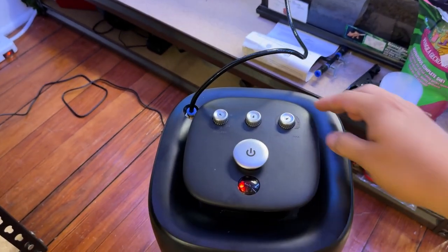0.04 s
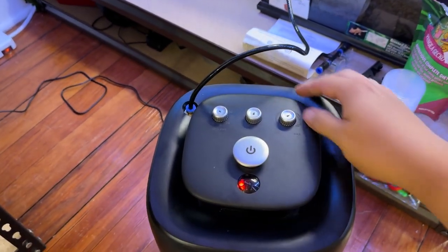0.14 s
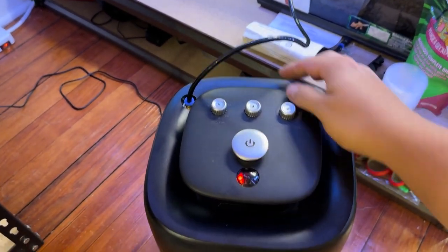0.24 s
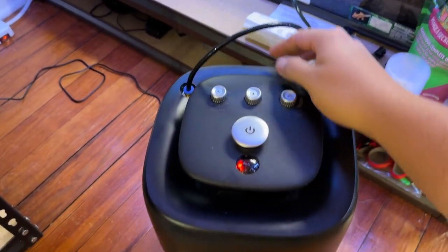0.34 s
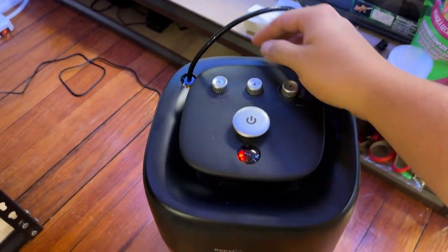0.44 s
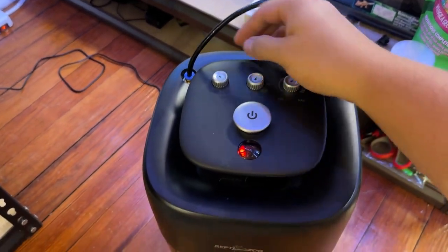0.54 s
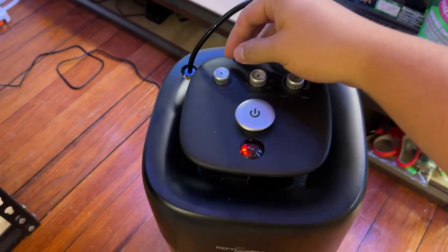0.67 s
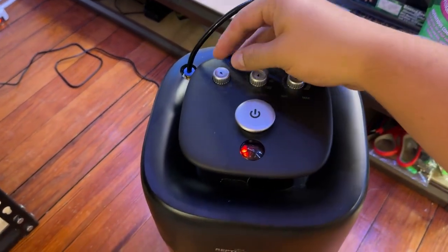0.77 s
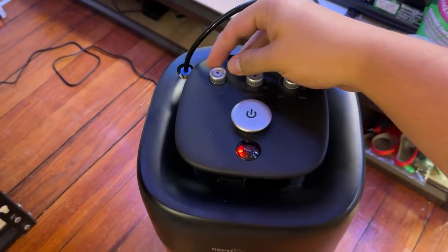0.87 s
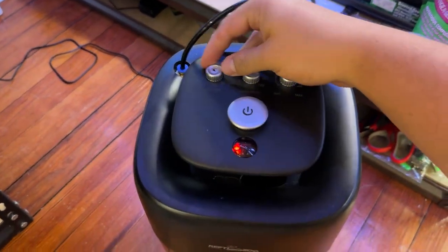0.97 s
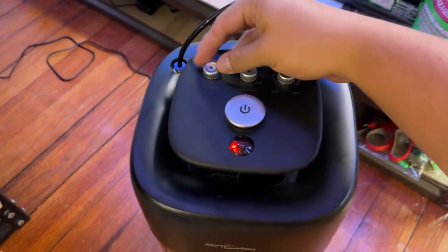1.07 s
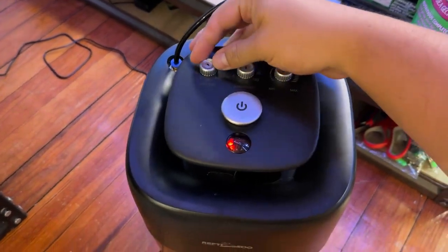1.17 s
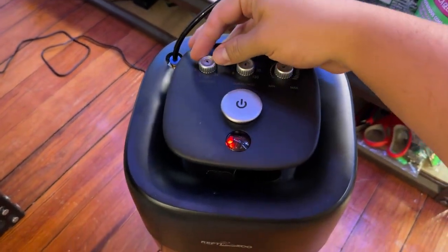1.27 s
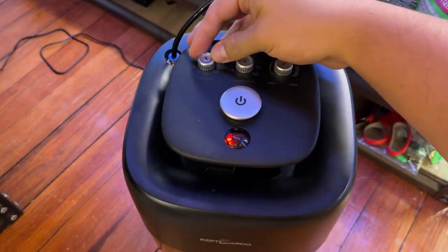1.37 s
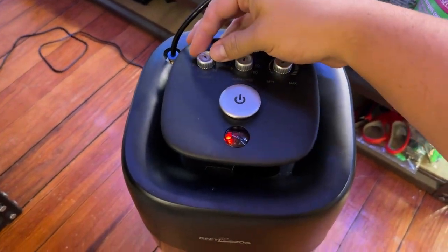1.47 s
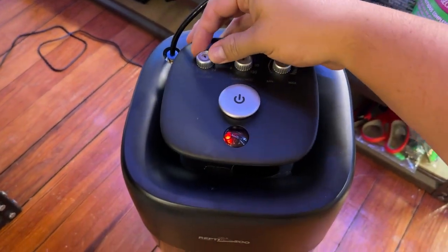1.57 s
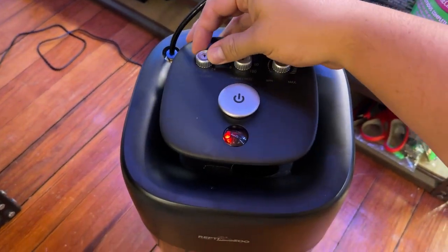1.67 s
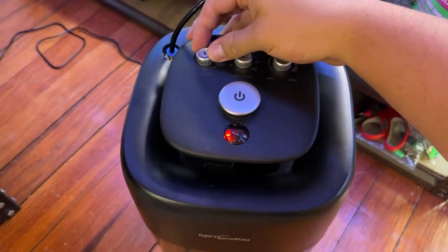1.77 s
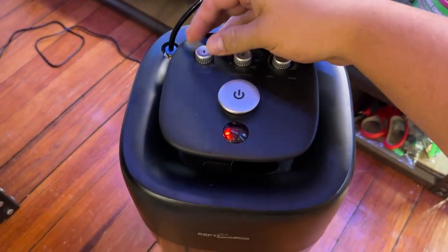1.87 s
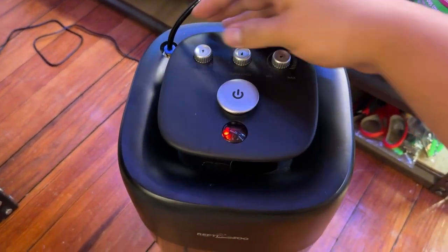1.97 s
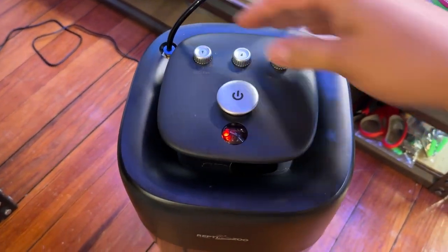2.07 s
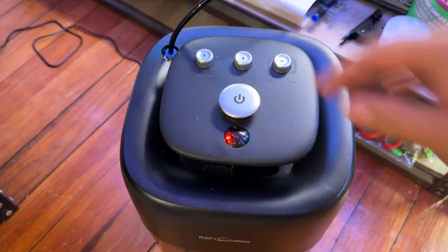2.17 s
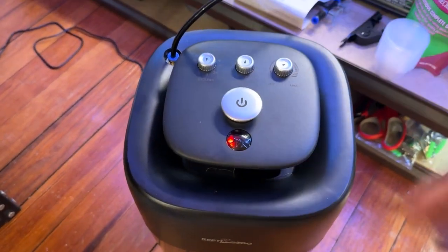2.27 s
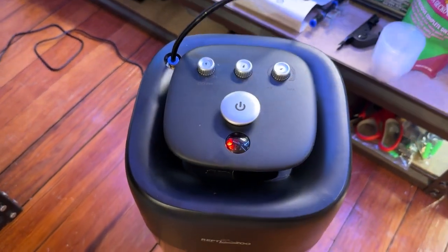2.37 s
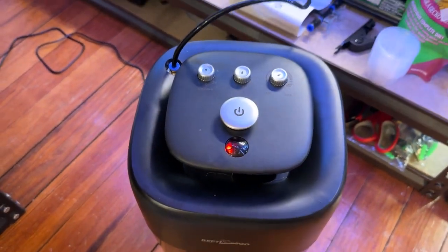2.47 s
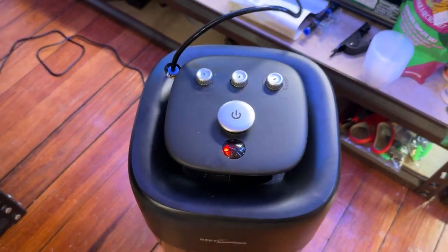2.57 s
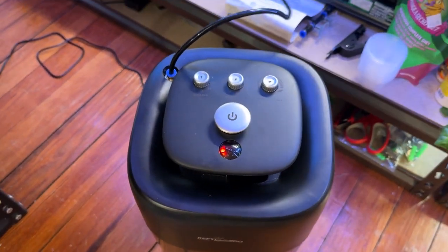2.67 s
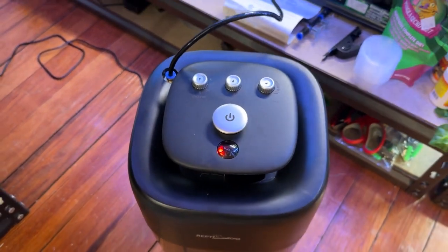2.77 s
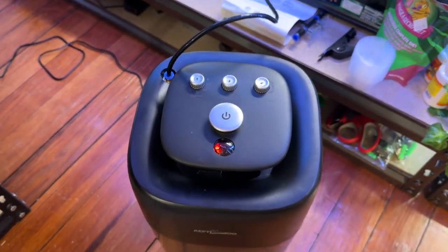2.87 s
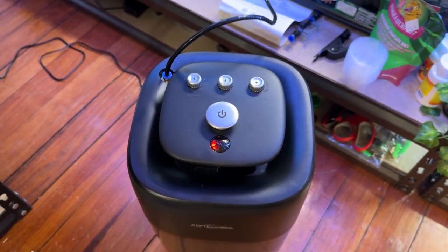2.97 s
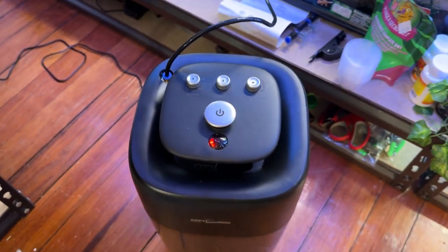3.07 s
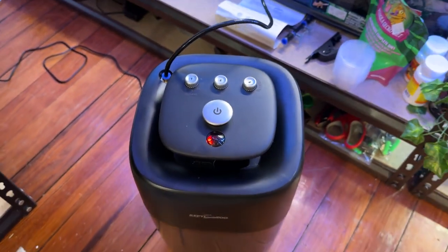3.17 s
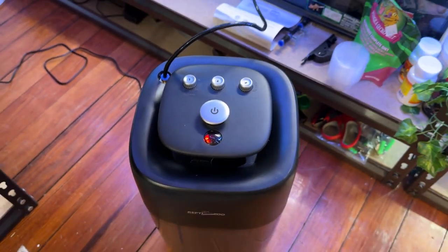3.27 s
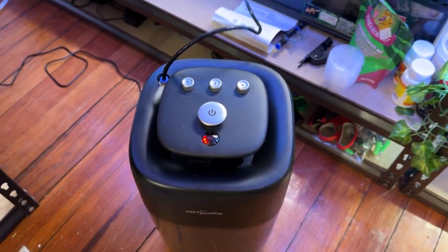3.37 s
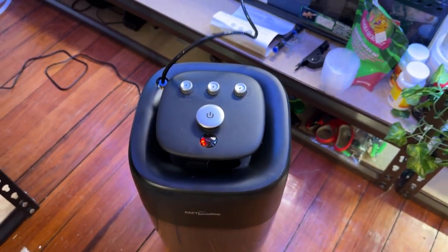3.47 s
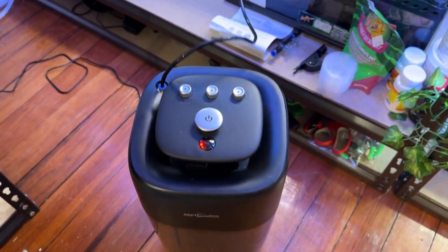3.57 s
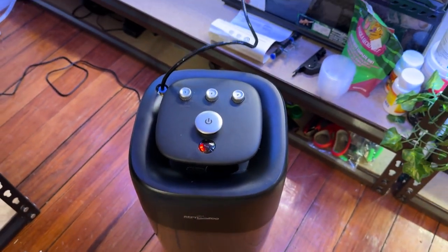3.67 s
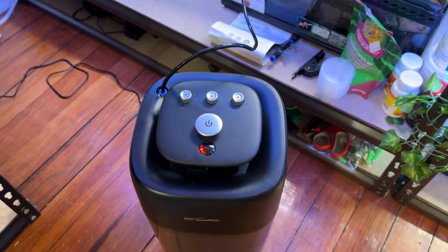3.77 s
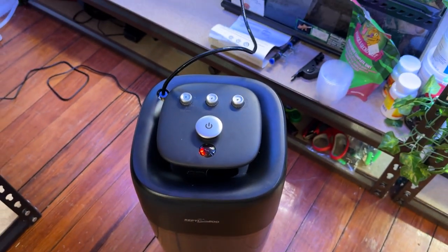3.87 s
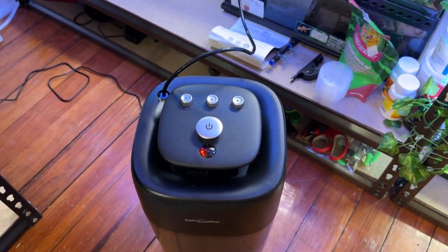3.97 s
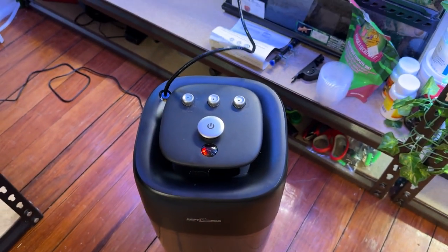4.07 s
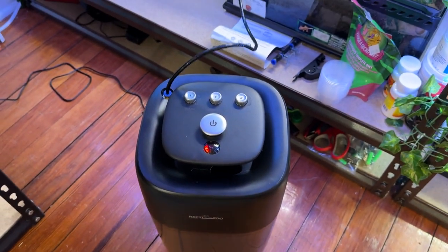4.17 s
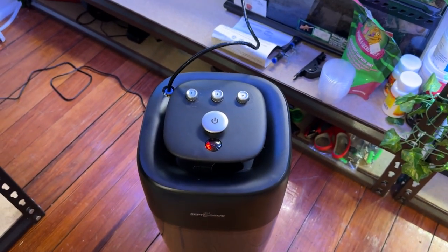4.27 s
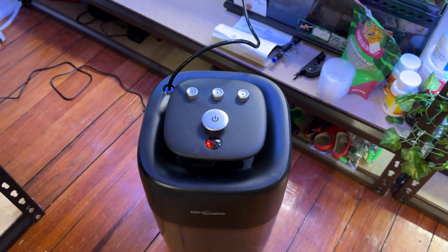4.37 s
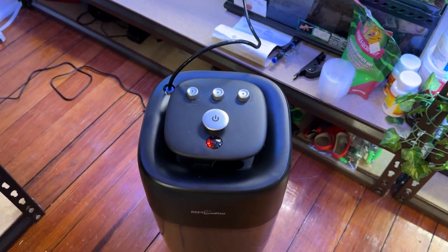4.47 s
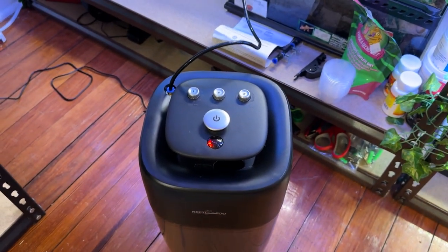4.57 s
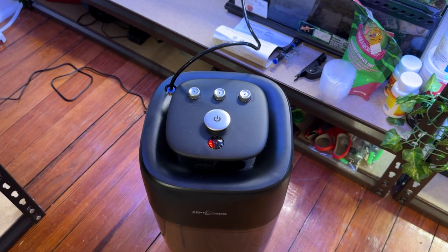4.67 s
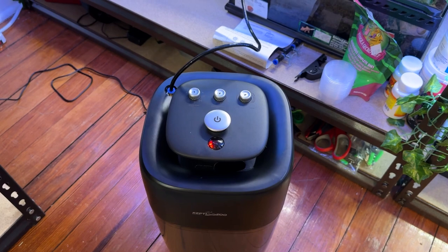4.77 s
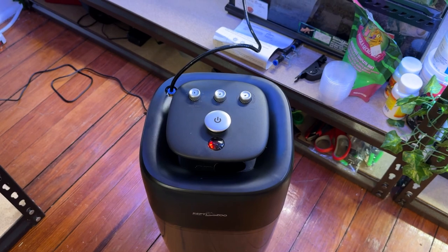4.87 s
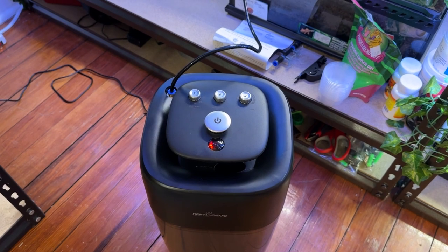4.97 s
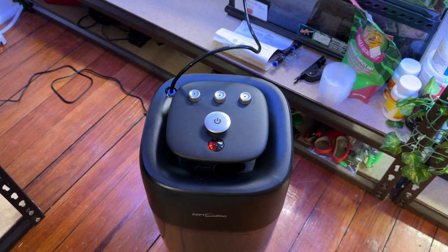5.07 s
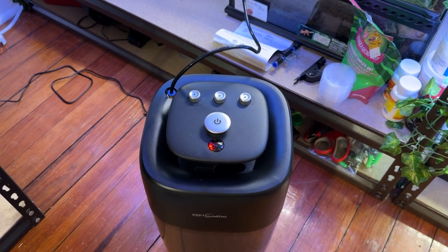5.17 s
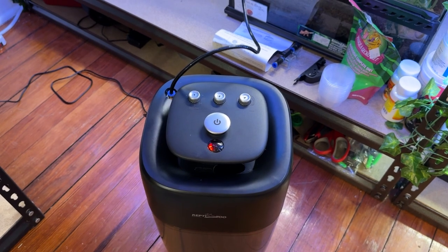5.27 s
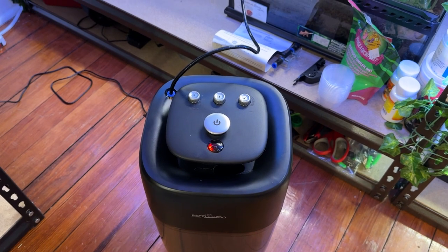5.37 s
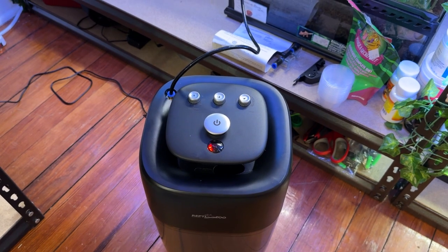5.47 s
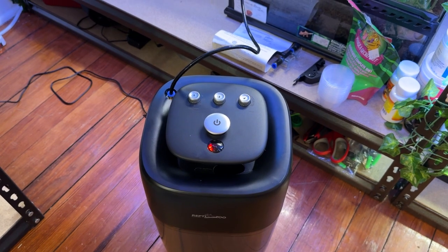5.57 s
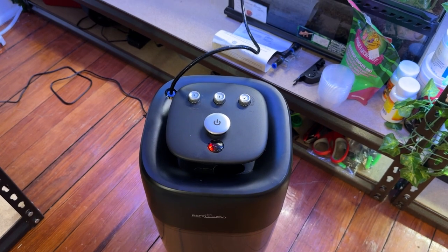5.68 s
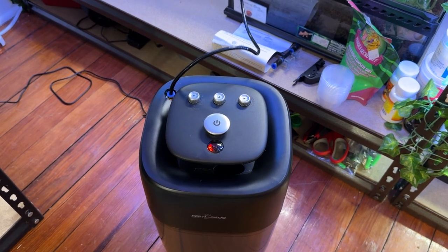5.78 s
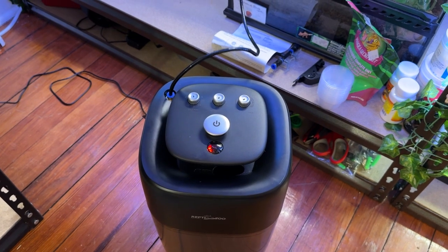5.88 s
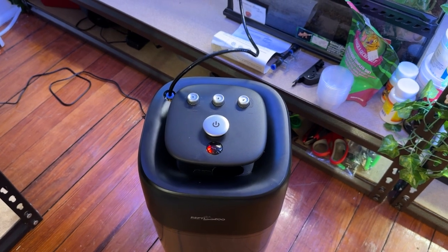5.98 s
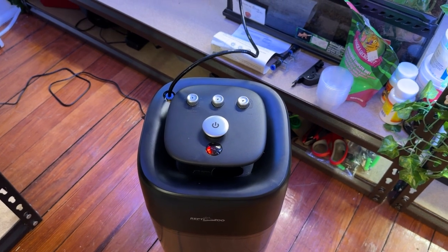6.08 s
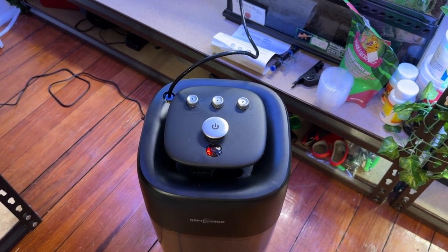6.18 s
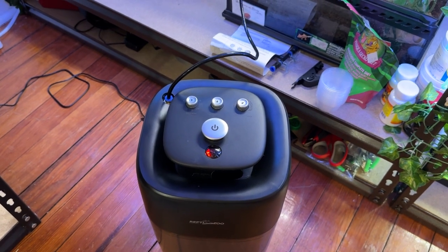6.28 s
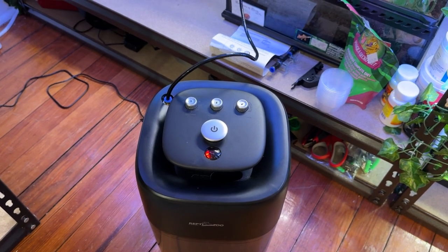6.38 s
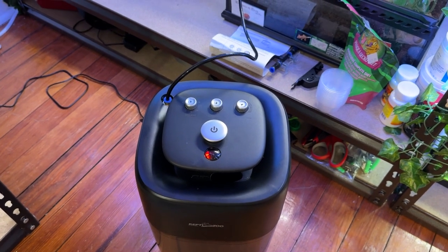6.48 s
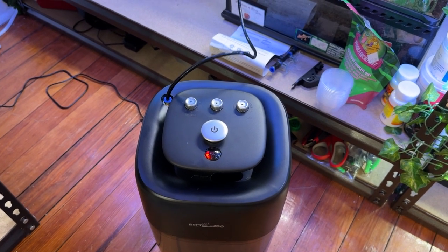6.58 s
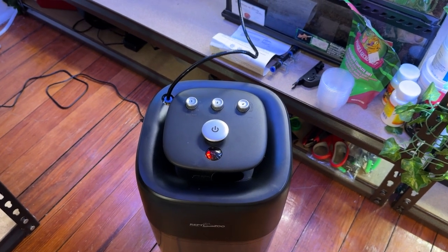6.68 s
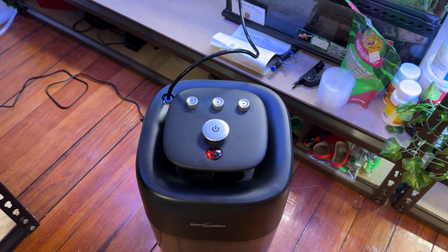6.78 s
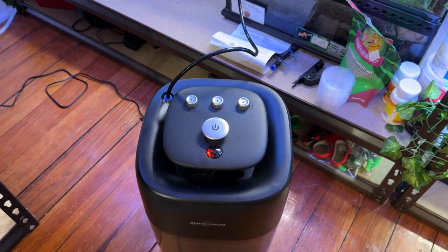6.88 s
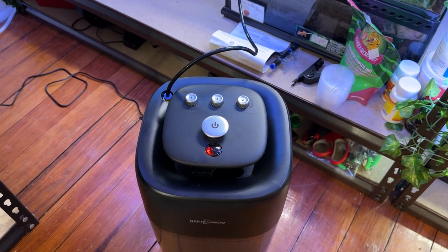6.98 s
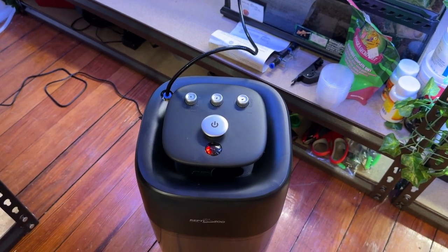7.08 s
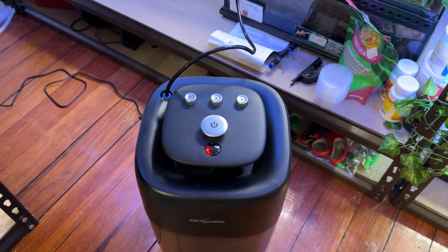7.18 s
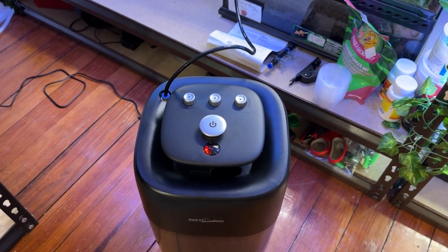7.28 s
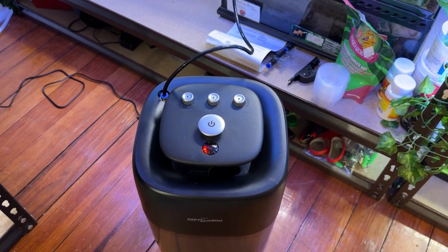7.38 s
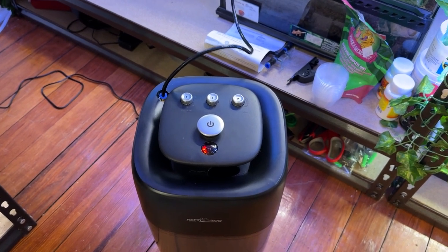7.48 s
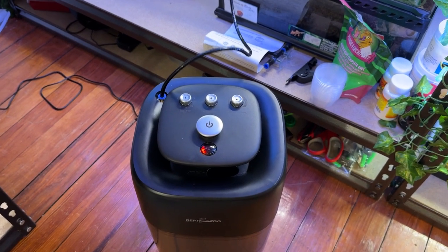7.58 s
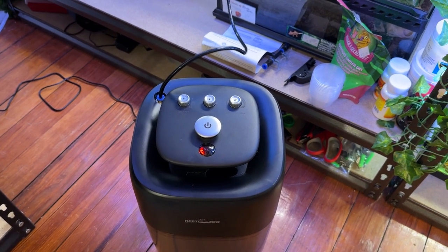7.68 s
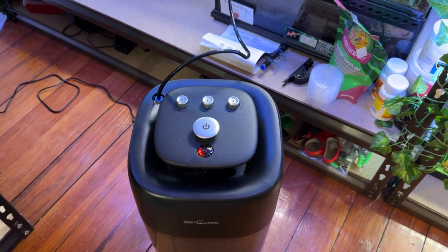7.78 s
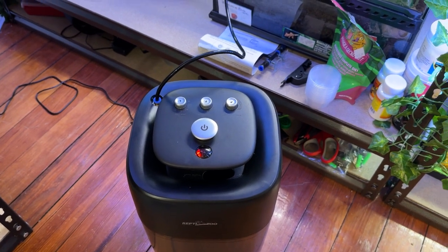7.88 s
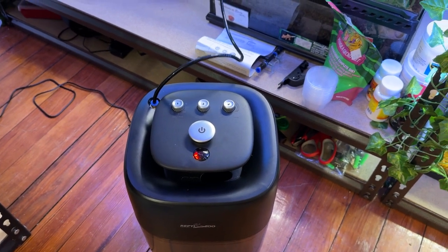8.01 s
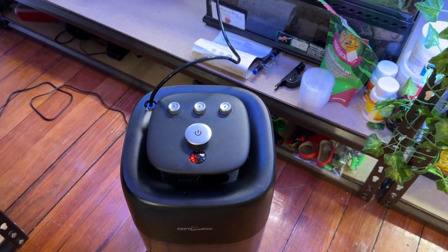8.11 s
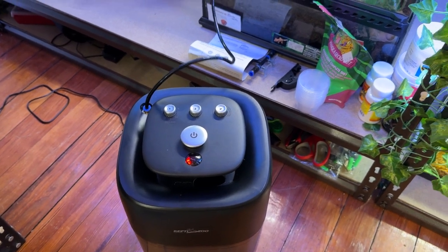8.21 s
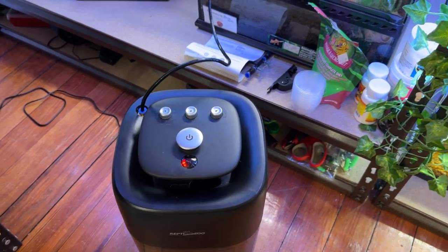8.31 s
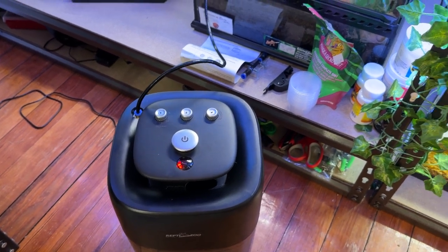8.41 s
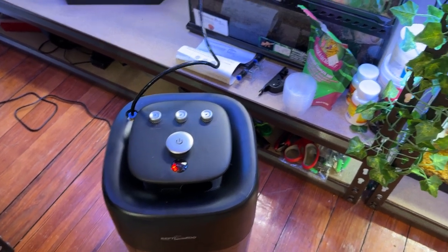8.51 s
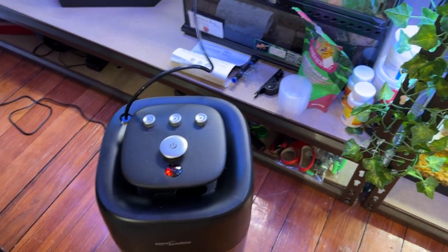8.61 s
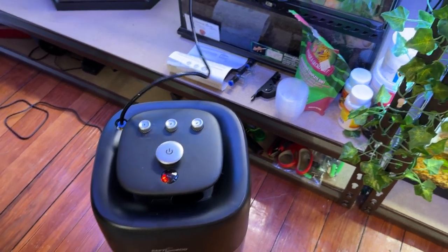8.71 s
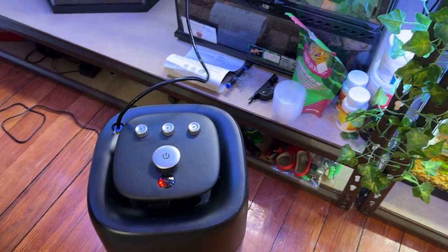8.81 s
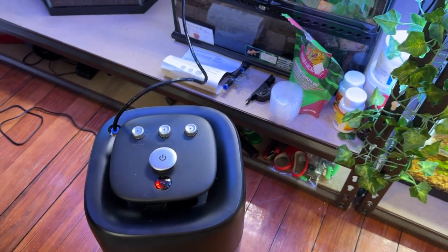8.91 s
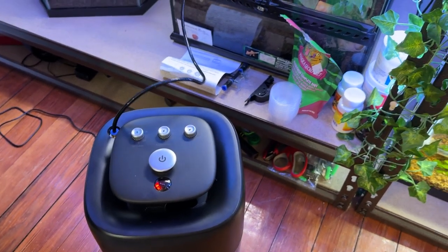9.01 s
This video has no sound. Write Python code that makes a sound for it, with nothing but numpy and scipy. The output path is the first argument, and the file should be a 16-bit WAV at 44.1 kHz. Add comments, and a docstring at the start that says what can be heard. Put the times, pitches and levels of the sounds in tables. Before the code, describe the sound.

A knob clicks, a small pump thumps on and hums steadily, water gurgles in its line, and a thin hiss grows into a full misting spray.

```python
"""A small misting pump hums on one steady note in a quiet room, close to the microphone, on a wooden floor.
A knob clicks, the pump starts with thumps, and water gurgles in its line as ringing bubbles and flow noise.
The nozzle spits; then, as the pressure rises, a thin hiss fills out into a steady spray.
The note is a sum of sine waves; hiss, rumble and contacts are coloured noise; thumps, bubbles and drops
are short damped tones."""
import sys
import numpy as np
from scipy import signal
from scipy.fft import rfft, irfft
from scipy.io import wavfile
from scipy.ndimage import uniform_filter1d

SR = 44100
rng = np.random.default_rng(int(sys.argv[2]) if len(sys.argv) > 2 else 0)


def put_to_file(sound):
    """Save the sound as 16-bit audio at rate SR, in the file named by the first command-line argument."""
    columns = np.atleast_2d(sound).T  # one column per channel
    safe = np.clip(columns, -1, 1)
    whole_steps = np.round(safe * 32767)
    wavfile.write(sys.argv[1], SR, whole_steps.astype(np.int16))


N = 399105
TIME = np.arange(N) / SR

STROKE_HZ = 244.15  # the pump's note
KICK_S, START_S = 1.84, 1.872  # water begins to move; the pump begins to hum
OPEN_FROM_S, OPEN_TO_S = 7.39, 8.13  # the full cone of spray opens
# how alike left and right are: pitch_hz, likeness (0 to 1)
LIKENESS = [(60, .985), (290, .97), (640, .68), (1400, .3), (3100, .12), (7000, .05), (10000, .75),
            (15000, .75)]
# how much louder the left is than the right: pitch_hz, difference_db
LEFT_LEAN = [(60, .6), (400, .7), (700, 1.6), (1300, 3), (2400, 5), (4400, 6), (8100, 1.5), (10000, 0),
             (15000, 0)]


def gain_of(db):
    """Turns decibels into a factor."""
    return 10 ** (np.asarray(db) / 20)


def evened(x):
    """Scales a signal to an rms (average strength) of 1."""
    return x / np.sqrt(np.mean(x ** 2) + 1e-20)


def read(points, hz):
    """Reads values between the points of a table, on a log-frequency axis."""
    table_hz, value = np.transpose(points)
    return np.interp(np.log(hz + 1), np.log(table_hz + 1), value)


def add(mix, start_s, sound):
    """Mixes a sound in at a time."""
    part = mix[round(start_s * SR):][:len(sound)]
    part += sound[:len(part)]


def ramp(start_s, end_s):
    """A smooth move from 0 to 1 between two times."""
    return np.sin(np.pi / 2 * np.clip((TIME - start_s) / (end_s - start_s), 0, 1)) ** 2


def swells(rows):
    """The summed power of bell-shaped swells."""
    return sum(gain_of(db) ** 2 * np.exp(-((TIME - s) / half_s) ** 2) for s, db, half_s in rows)


def drift(rate_hz):
    """Smooth random wandering of rms 1; movement faster than the rate fades out."""
    steps = int(N / SR * 1000) + 2
    hz = np.fft.rfftfreq(steps, N / SR / (steps - 1))
    spectrum = rfft(rng.standard_normal(steps)) / (1 + (hz / rate_hz) ** 4)
    slow = irfft(spectrum, steps)
    return evened(np.interp(TIME, np.linspace(0, N / SR, steps), slow))


def noise(colour, patchy_db=0, likeness=LIKENESS, late_s=0, treble_lead=False):
    """Coloured stereo noise with short patches over time and pitch; the left may lag, or lead in phase."""
    # the left side's phase lead over the right in the treble: pitch_hz, lead_radians
    left_lead = [(5500, 0), (7000, 1.8), (8100, 2.6), (11600, 0), (16000, -2.3)]
    hz = np.fft.rfftfreq(2048, 1 / SR)
    a, b, c, d, patches = rng.standard_normal((5, N // 512 + 5, len(hz)), dtype=np.float32)
    patches = uniform_filter1d(patches, size=3, axis=0)
    patches = evened(uniform_filter1d(patches, size=24, axis=1))
    left, other = a + 1j * b, c + 1j * d
    same = np.clip(read(likeness, hz), -1, 1)
    right = same * left + np.sqrt(1 - same ** 2) * other
    lean = gain_of(read(LEFT_LEAN, hz) / 2)
    lead = read(left_lead, hz) * treble_lead
    turn = np.exp(1j * lead - 2j * np.pi * np.minimum(hz, 5500) * late_s)  # a plain delay below the treble
    z = np.array([left * lean * turn, right / lean])
    keep = np.sqrt((1 + same) / (1 + same * np.cos(lead)))  # the sum of both sides keeps its colour
    z *= keep * gain_of(read(colour, hz) + patchy_db * np.clip(patches, -2.5, 2.5))
    pair = signal.istft(z, nperseg=2048, noverlap=1536, time_axis=1, freq_axis=2)[1][:, :N]
    return pair / np.std(pair.mean(0))


def ring(hz, rise_s, t60_s, glide=0):
    """A tone that starts softly and dies by 60 dB in t60_s; with a glide, its pitch climbs as it dies."""
    t = np.arange(int((rise_s + t60_s) * SR)) / SR
    swell = np.sin(np.pi / 2 * np.minimum(t / rise_s, 1)) ** 2
    fade = np.exp(-np.log(1000) * t / t60_s)
    return swell * fade * np.sin(2 * np.pi * hz * t * (1 + glide * t / t60_s))


def bursts(rows, colour, t60_s, rough_db, echo_db, echo_t60_s=0.52):
    """Short noisy events: a quick rise, a hold, a fall, and a weak tail from the room."""
    power = np.zeros(N)
    t = np.arange(SR // 2) / SR
    for start_s, db, hold_s in rows:
        after = np.maximum(t - hold_s, 0)
        direct = gain_of(-60 * after / t60_s) ** 2
        echo = gain_of(echo_db - 60 * after / echo_t60_s) ** 2
        rise = np.minimum(t / 0.00092, 1)
        add(power, start_s, gain_of(db) ** 2 * (direct + echo) * rise)
    return noise(colour) * np.sqrt(power) * gain_of(rough_db * drift(200))


def in_room(x, wet_db, t60_s):
    """Direct sound plus sparse, dying reflections, different on each side."""
    t = np.arange(SR // 2) / SR
    chosen = rng.random((2, len(t))) < 2000 / SR  # about 2000 reflections a second
    taps = rng.standard_normal((2, len(t))) * chosen * (t > .002)
    taps = taps * np.exp(-np.log(1000) * t / t60_s)
    taps = taps / np.linalg.norm(taps, axis=1, keepdims=True)
    tail = signal.oaconvolve(x[None], taps, axes=1)[:, :N]
    return x + gain_of(wet_db) * tail


def glance(pair):
    """A few weak reflections off the housing and the floor comb the hiss."""
    delays = rng.integers(SR // 1000, SR // 100, 8)  # 1 to 10 ms, in samples
    return pair + gain_of(-20) * sum(np.pad(pair, ((0, 0), (d, 0)))[:, :N] for d in delays)


def distance_db():
    """The pump grows quieter, by 3.5 dB in all, as the microphone is drawn back."""
    return -3.5 * ramp(2.1, 4.3)


def trapped_air():
    """The share of air left in the line: 1 until the kick, then flushed out little by little."""
    flush_s = 0.98  # time to fall to about a third
    return np.exp(-np.maximum(TIME - KICK_S, 0) / flush_s)


def cone_opening():
    """The strength of the spray: 0 when shut, 1 when just open, then growing with the pressure."""
    growth_db_per_s = 4
    return ramp(OPEN_FROM_S, OPEN_TO_S) * gain_of(growth_db_per_s * (TIME - OPEN_TO_S))


def room_tone():
    """Low room rumble with mains hum, a faint uneven treble fizz, and a hand shifting on the microphone."""
    # mains hum: pitch_hz, level_db (before a slow waver)
    mains = [(59.5, -56), (120, -56), (240, -64)]
    # spectra of the room, the fizz and the handling rumble: pitch_hz, density_db (per Hz)
    room_colour = [(13, -43), (22, -30), (47, 0), (70, -3), (89, -33), (124, -4.5), (159, -19.5),
                   (246, -15), (267, -25), (306, -14), (625, -32.5), (1550, -29), (3160, -38), (10600, -83),
                   (15500, -71)]
    fizz_colour = [(2500, -26), (4300, 3), (6000, -2), (8000, -5.5), (10000, -1), (15500, -17.5)]
    handling_colour = [(30, -22), (50, 3), (70, 0), (110, -8), (300, -40), (1000, -80)]
    # the hand shifts on the microphone: middle_s, level_db, half_length_s
    shifts = [(1.8, -50, .15), (8.25, -50, 0.33), (8.9, -54, 0.37)]
    hum = 0
    for hz, db in mains:
        tone = np.sin(2 * np.pi * (hz * TIME + rng.random()))
        hum = hum + np.sqrt(2) * gain_of(db + drift(3.9)) * tone
    air = noise(room_colour, patchy_db=1) * gain_of(-52 + .5 * drift(5))
    fizz = noise(fizz_colour, patchy_db=2) * gain_of(-76 + 1.8 * drift(18))
    handling = noise(handling_colour) * np.sqrt(swells(shifts))
    return hum + air + fizz + handling


def hand_brush():
    """A hand rubs the housing: a soft burst of noise."""
    # brushes: start_s, level_db, hold_s
    strokes = [(.126, -56.5, .064)]
    # spectrum: pitch_hz, density_db (per Hz)
    colour = [(600, -7), (1200, 0), (2500, 4), (3600, -13), (5000, -11), (8000, -14), (10500, -7.5),
              (15500, -21)]
    return bursts(strokes, colour, t60_s=.2, rough_db=0.5, echo_db=-7)


def knob_click():
    """The knob's switch snaps: a hard contact makes a short bright burst."""
    # clicks: start_s, level_db, hold_s
    snaps = [(1.6533, -42.5, 0.0031)]
    # spectrum: pitch_hz, density_db (per Hz)
    colour = [(600, -25), (1300, -1.5), (2500, 5), (4500, -6.5), (6000, 3), (7500, -9), (10000, 1.5),
              (12500, -7), (15500, -10)]
    return bursts(snaps, colour, t60_s=0.035, rough_db=1.5, echo_db=-9.5, echo_t60_s=0.18)


def thumps():
    """The housing rocks on the floor as the pump kicks in: each blow rings as a damped tone."""
    # blows: start_s, level_db, pitch_hz, rise_s, t60_s (time to die by 60 dB)
    blows = [(1.708, -42, 70, 0.0055, .1), (1.735, -25.5, 55, 0.0068, 0.11),
             (1.772, -30.5, 68.3, 0.0072, 0.21), (1.8545, -18.5, 181, 0.0082, 0.096),
             (1.8785, -35, 880, 0.0037, 0.046), (1.9, -33.5, 60.7, 0.0091, 0.31)]
    out = np.zeros(N)
    for start_s, db, hz, rise_s, t60_s in blows:
        add(out, start_s, gain_of(db) * ring(hz, rise_s, t60_s))
    return in_room(out, wet_db=-22, t60_s=0.22)


def valve_knocks():
    """Valves knock: hard contacts with most of their strength below about 2 kHz."""
    # knocks: start_s, level_db, hold_s
    hits = [(1.843, -52, 0.023), (1.8782, -38.5, 0.0023), (2.185, -52.5, .003), (2.53, -59, .035),
            (2.587, -49, .005), (2.615, -52, .004), (2.634, -55, .012), (2.68, -55, 0.016),
            (2.772, -51.5, 0.0053), (7.443, -52, .009)]
    # spectrum: pitch_hz, density_db (per Hz)
    colour = [(400, -1.5), (700, 0.5), (880, -1), (1150, -2.5), (1600, 1), (2000, -2.5), (2800, -15),
              (6000, -29), (15000, -35)]
    return bursts(hits, colour, t60_s=0.043, rough_db=-1.5, echo_db=-14.5)


def bubbles(small_db=-56.5, spread_db=1.0, glide=0.016):
    """Air in the line rings at the tube's resonances: a random stream of small bubbles and a few gulps."""
    # single large bubbles: start_s, level_db (before a 3 dB lift), pitch_hz (at the start of the glide)
    gulps = [(2.492, -37.5, 600), (2.638, -35.5, 674), (2.68, -44, 616), (6.788, -48, 640),
             (6.884, -48, 656), (7.075, -46, 630), (7.172, -47, 637), (7.34, -47, 670), (7.54, -43.5, 677),
             (7.573, -44, 625), (7.64, -43, 684)]
    pitches_hz = [467, 570, 601, 630, 665, 717]
    # bubbles a second: calm flow, more while air is flushed out, more once water spills back into the tank
    per_s = 2 + 50 * trapped_air() + 60 * ramp(6.6, 6.95)
    born = (rng.random(N) < per_s / SR) & (TIME > START_S)
    size = born * gain_of(small_db + spread_db * np.minimum(rng.exponential(1, N), 2.5))
    which = rng.integers(0, len(pitches_hz), N)
    out = np.zeros(N)
    for k, hz in enumerate(pitches_hz):
        out += signal.oaconvolve(size * (which == k), ring(hz, 0.0015, 0.071, glide))[:N]
    for start_s, db, hz in gulps:
        add(out, start_s, gain_of(db + 3) * ring(hz, 0.0025, 0.03, glide))
    return in_room(out, wet_db=-2.5, t60_s=0.18)


def water(pulsing=0.082, surge_db=3.0, lumpy_db=2):
    """Flow noise beats at the stroke rate and grows as the line is strained; the tank rumbles in lumps."""
    # spectra of the flow and of the tank: pitch_hz, density_db (per Hz)
    flow_colour = [(200, -35), (380, -13.5), (480, -6.5), (600, -9), (658, -2), (700, -17), (850, -33),
                   (1100, -12.5), (1850, -8), (2300, -20.5), (3300, -18), (4800, -31), (6400, -21),
                   (8200, -29), (10300, -26), (12000, -37), (15500, -30)]
    churn_colour = [(35, -18.5), (70, -21), (100, -3), (145, -13), (175, 4.5), (200, -13), (225, 10),
                    (262, 0.5), (295, -19), (400, -17), (520, -13), (800, -40.5), (1500, -69)]
    strain_s, growth_db_per_s = 6.82, 3
    beat = 1 + pulsing * np.sin(2 * np.pi * STROKE_HZ * TIME)
    flow_db = -63.5 + distance_db() + growth_db_per_s * np.maximum(TIME - strain_s, 0)
    flow = noise(flow_colour, patchy_db=3.0) * beat * gain_of(flow_db + surge_db * drift(44))
    churn = noise(churn_colour) * gain_of(-53 + lumpy_db * drift(29))
    return (flow + churn) * ramp(KICK_S, KICK_S + .05)


def sizzles():
    """Air sizzles through the wet nozzle: faint, rough bursts of noise."""
    # sizzles: start_s, level_db, hold_s
    rushes = [(.01, -73.5, .065), (2.68, -77, 0.24), (5.52, -76, 0.35), (6.48, -78, .15)]
    # spectrum: pitch_hz, density_db (per Hz)
    colour = [(1800, -24), (2700, 0), (3350, 4), (3900, -11), (5000, -20), (6500, -14), (12000, -28)]
    return bursts(rushes, colour, t60_s=.19, rough_db=5.0, echo_db=-22)


def droplets(spray_per_s=430, spray_db=-63.0, spread_db=1.5):
    """Tiny drops tick in the wet housing, more once the pump runs, and patter densely in the open spray."""
    pitches_hz = np.geomspace(3600, 12000, 24)
    opening = cone_opening()
    running = 1 + (TIME > START_S)  # 1 before the start, 2 after
    born = rng.random(N) < (16 * running + spray_per_s * opening) / SR
    idle = gain_of(-62.5) * np.sqrt(running)
    spread = gain_of(spread_db * np.minimum(rng.exponential(1, N), 3))
    size = born * (idle + gain_of(spray_db) * opening) * spread
    which = rng.integers(0, len(pitches_hz), N)
    out = np.zeros(N)
    for k, hz in enumerate(pitches_hz):
        tick = ring(hz, .0003, .009) * (pitches_hz[0] / hz) ** .4  # smaller drops ring higher and softer
        out += signal.oaconvolve(size * (which == k), tick)[:N]
    return in_room(out, wet_db=6.5, t60_s=0.1) * gain_of([[1], [-1]])  # left up 1 dB, right down 1 dB


def spits():
    """The nozzle spits: short rushes of bright noise."""
    # spits: start_s, level_db, hold_s
    rushes = [(2.03, -67, 0.014), (2.184, -67, .003), (2.51, -68, .008), (3.335, -64, .04),
              (3.875, -65.5, .035), (3.958, -59.5, 0.028), (4.046, -63.5, .008), (4.503, -63.5, .01),
              (6.790, -53, .009), (6.941, -53.5, 0.037), (8.255, -59, .04)]
    # spectrum: pitch_hz, density_db (per Hz)
    colour = [(2000, -10.5), (4000, -4.5), (5300, -1.5), (7000, -5), (10000, -1.5), (12000, -5),
              (14000, -2.5), (15800, -10.5)]
    return bursts(rushes, colour, t60_s=0.22, rough_db=0.5, echo_db=-20)


def jet_gain():
    """The jet grows with the pressure, chokes once on an air pocket, and surges."""
    # surges: middle_s, level_db (before the choke), half_length_s
    surges = [(5.91, -61, 0.079), (6.12, -61, 0.021), (6.29, -58.5, 0.065), (7.455, -51, 0.042),
              (7.56, -54, .05)]
    full_s, rise_s = 5.07, 0.62  # once the line is full the jet sets in softly
    choke_s, choke_db, fall_s, recover_s = 6.53, -13.5, 0.049, 0.18
    since = TIME - choke_s
    choke = np.exp(-np.where(since < 0, (since / fall_s) ** 2, since / recover_s))
    growth_db = -73.5 + 6.1 * (TIME - full_s)  # 6.1 dB a second
    steady = ramp(full_s, full_s + rise_s) * gain_of(growth_db)
    return np.sqrt(steady ** 2 + swells(surges)) * gain_of(choke_db * choke)


def mist(sputter_db=1, spray_db=-54.5, flicker_db=0.6):
    """A thin, sputtering jet comes first; the broader hiss of the spray joins it, with coarse splutters."""
    # spectra of the jet, the spray and the splutters: pitch_hz, density_db (per Hz)
    jet_colour = [(500, -35), (1500, -15), (2800, -7.5), (4200, -9), (5500, -2.5), (6600, -6), (8200, -9),
                  (9300, -3), (10700, -3), (11800, -9), (14300, -7.5), (15800, -14)]
    spray_colour = [(300, -26), (600, -5), (900, -2.5), (1500, -4), (2300, -6), (3100, 0.5), (4100, -6.5),
                    (5200, -1.5), (5900, -4), (6800, -6), (8200, -9), (10400, -7.5), (12000, -18),
                    (15500, -21)]
    splutter_colour = [(250, 1), (600, -1), (900, -10), (1500, 0), (2300, -10.5), (5000, -9), (12000, -30)]
    # how alike left and right are in the jet and spray: pitch_hz, likeness (0 to 1)
    spray_likeness = [(300, .9), (700, .55), (1400, .35), (5500, .35), (7500, .6), (10000, .82),
                      (12500, .9), (15000, .7)]
    # coarse drops splutter: start_s, level_db, hold_s
    splutters = [(8.032, -52, .006), (8.258, -53, .04), (8.375, -50, 0.016), (8.493, -51.5, 0.024),
                 (8.605, -54.5, 0.027), (8.72, -52, .02), (8.945, -55, 0.025)]
    thin = noise(jet_colour, patchy_db=1.5, likeness=spray_likeness, treble_lead=True)
    jet = thin * jet_gain() * gain_of(sputter_db * drift(70))
    cone = noise(spray_colour, patchy_db=1.5, likeness=spray_likeness, late_s=.00036, treble_lead=True)
    spray = cone * cone_opening() * gain_of(spray_db + flicker_db * drift(90))
    coarse = bursts(splutters, splutter_colour, t60_s=0.067, rough_db=3.5, echo_db=-21)
    return glance(jet + spray) + coarse


def pump(wobble=0.00105, wobble_hz=4.6, flutter_db=0.24, rattle_db=3, nearness=0.2):
    """Eight strokes to a turn of the shaft: a strong clean note, fluttering overtones and shaft lines."""
    # overtones of the stroke rate: multiple, level_db (beside the note, before flutter)
    overtones = [(2, -25), (3, -46), (4, -38.5), (5, -57), (6, -50), (7, -40.5), (8, -34.5), (9, -44.5),
                 (10, -45), (11, -44)]
    # weaker lines from the uneven turn of the shaft: multiple of the shaft rate, level_db (as above)
    shaft_lines = [(4, -27.5), (5, -28), (6, -26), (7, -25.5), (9, -33.5), (10, -34), (12, -34.5)]
    strokes_per_turn = 8
    strokes = np.cumsum(STROKE_HZ * (1 + wobble * drift(wobble_hz))) / SR  # strokes made so far
    lag = np.array([[0], [.22]])  # radians by which the note reaches each side
    note = np.sin(2 * np.pi * strokes - lag)
    pair = note * gain_of(flutter_db * drift(14)) * gain_of([[.35], [-.35]])
    sag_db = -0.6 * ramp(OPEN_FROM_S, OPEN_TO_S)  # the load of the open spray
    level_db = -34 + distance_db() + sag_db + 0.32 * drift(2.7)
    bright_db = nearness * (level_db - np.median(level_db))  # close by, overtones gain more than the note
    lines = overtones + [(k / strokes_per_turn, db) for k, db in shaft_lines]
    for k, db in lines:
        hz = k * STROKE_HZ
        loose = .2 if k == 2 else 1  # the octave is nearly as steady as the note
        angle = 2 * np.pi * (k * strokes + rng.random()) + 0.2 * loose * drift(13)
        apart = np.arccos(np.clip(read(LIKENESS, hz), -1, 1))  # sides less alike are further out of step
        lean = gain_of(read(LEFT_LEAN, hz) / 2)
        size = gain_of(db + loose * (bright_db + rattle_db * drift(17)))
        pair = pair + size * np.array([np.sin(angle) * lean, np.sin(angle - apart) / lean])
    running = np.clip((TIME - START_S) / 0.03, 0, 1)
    return np.sqrt(2) * pair * running * gain_of(level_db)


def scene():
    """Adds up the room, hand, knob, housing, water, mist and pump."""
    background = room_tone() + hand_brush() + knob_click()
    housing = thumps() + valve_knocks()
    line = bubbles() + water()
    nozzle = sizzles() + droplets() + spits() + mist()
    return background + housing + line + nozzle + pump()


def record(dry, low_cut_hz=36, edge_hz=15800):
    """The microphone drops the deepest bass; then a filter removes the highest treble."""
    bass_cut = signal.butter(6, low_cut_hz, "highpass", fs=SR, output="sos")
    thinned = signal.sosfilt(bass_cut, dry)
    treble_cut = signal.firwin(511, edge_hz, window=("kaiser", 9), fs=SR)
    return signal.oaconvolve(thinned, treble_cut[None], "same")


dry = scene()
out = record(dry)
put_to_file(out)
```